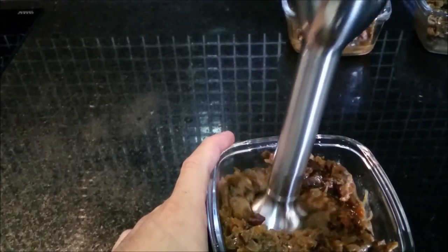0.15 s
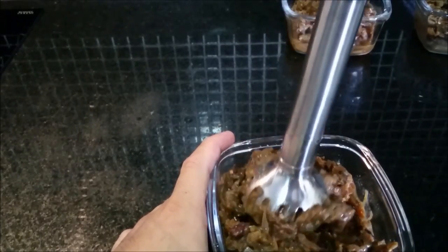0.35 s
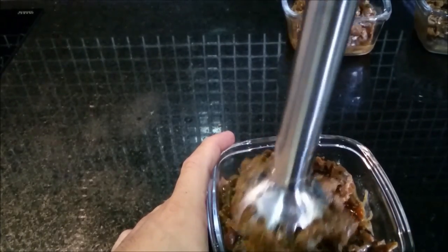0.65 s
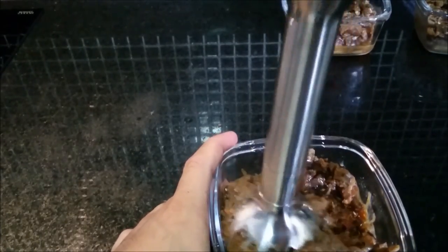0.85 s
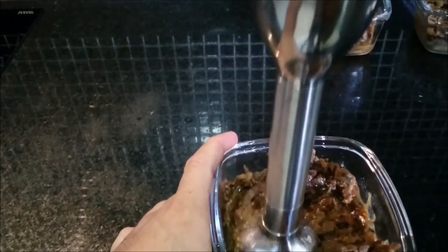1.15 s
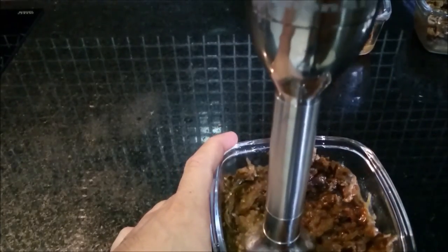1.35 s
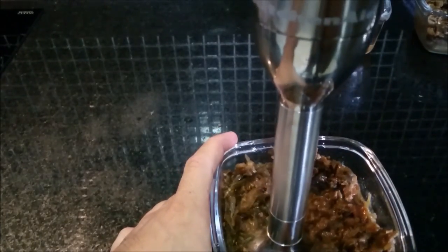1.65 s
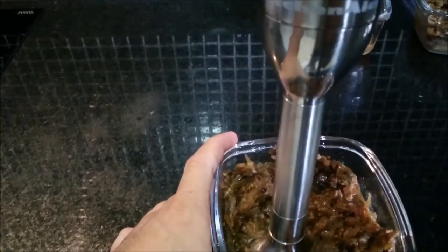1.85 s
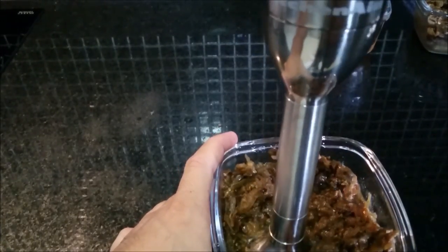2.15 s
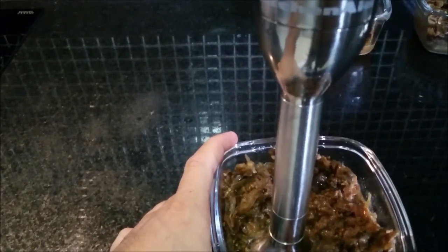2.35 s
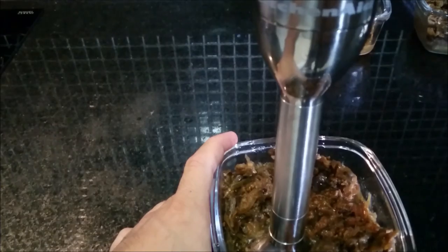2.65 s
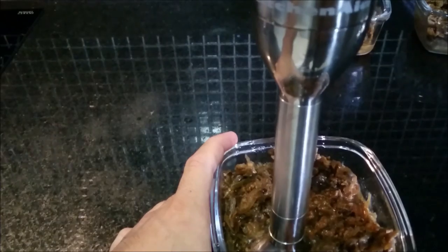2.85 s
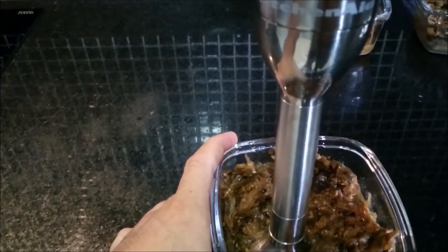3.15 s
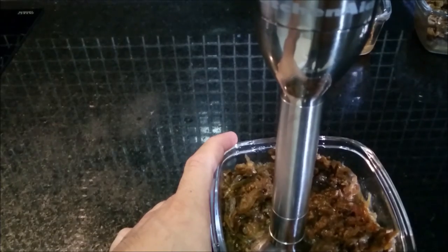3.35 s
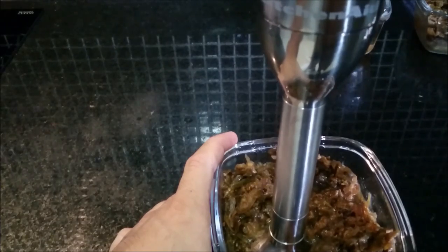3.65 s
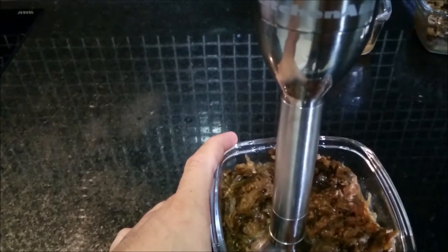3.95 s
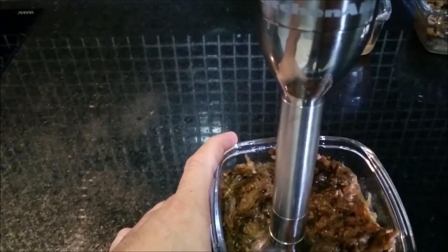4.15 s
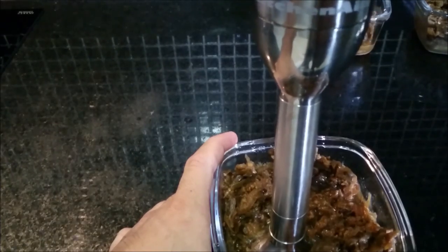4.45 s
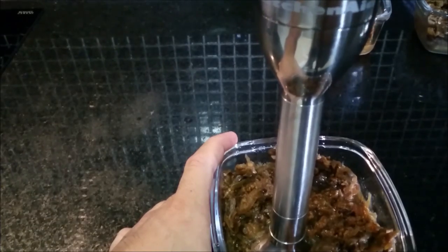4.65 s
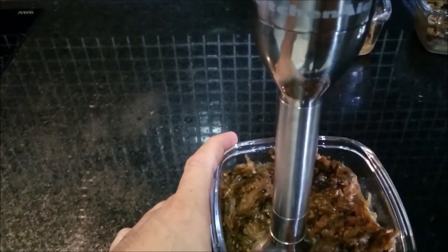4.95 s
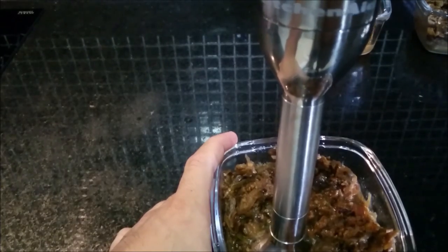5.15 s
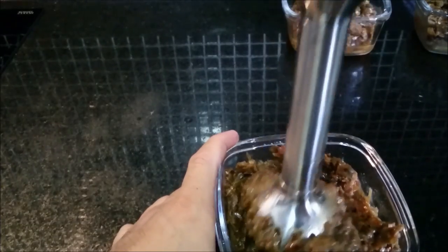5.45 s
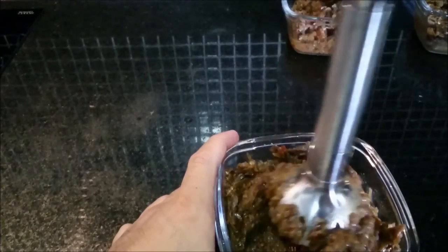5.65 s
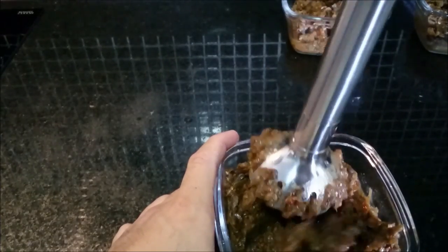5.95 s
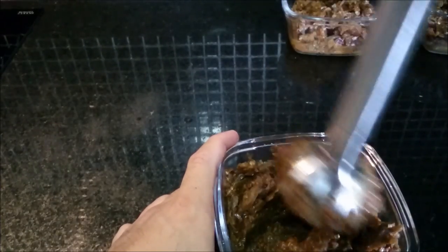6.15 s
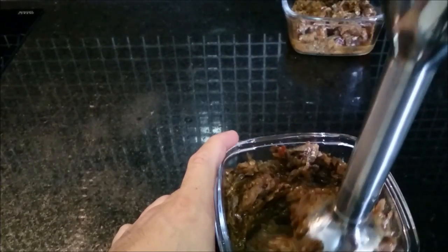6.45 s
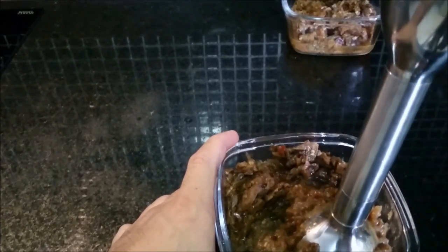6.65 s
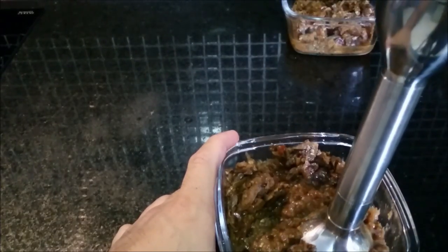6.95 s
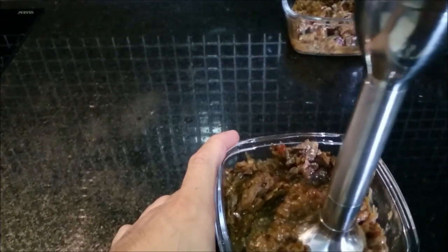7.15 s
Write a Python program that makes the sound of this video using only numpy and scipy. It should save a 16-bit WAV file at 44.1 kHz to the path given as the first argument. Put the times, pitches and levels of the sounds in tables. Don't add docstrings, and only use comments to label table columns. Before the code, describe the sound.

A close stereo microphone in a small, lively kitchen hears a hand blender already grinding thick food; it cuts off at 0.3 seconds with a click and a soft thud. At about 0.8 a quick cluster of loud steel-on-glass knocks rings out. Small creaks and clicks lead to a second burst from 1.2 to 1.9, with hard lumps snapping against the left side. Clicks, dull ticks and faint paste squeaks fill the gap before a short third burst at 3.1 to 3.5. More clicks and a falling squeak follow. A louder, faster-spinning burst runs from 4.7 to 5.1, then sharp knocks come at 5.3 to 5.4. A soft thud at 5.7, sliding squeaks around 6 and handling clicks near 6.5 precede the final burst, from 6.6 to the end. The motor's thin whine holds a fixed pitch over rattling, hissing churn; faint fridge hum lies beneath.

```python
import sys
import numpy as np
from scipy import signal
from scipy.fft import rfft, irfft, next_fast_len
from scipy.io import wavfile
from scipy.ndimage import map_coordinates

SR = 44100
rng = np.random.default_rng(int(sys.argv[2]) if len(sys.argv) > 2 else 0)


def file_out(sig):
    cols = np.atleast_2d(sig).T
    lim = np.clip(cols, -1, 1)
    pcm = np.round(lim * 32767).astype(np.int16)
    wavfile.write(sys.argv[1], SR, pcm)


def elevation(decibels):
    levels = np.asarray(decibels, float)
    return 10 ** (levels / 20)


N = 321930
TIME = np.arange(N) / SR
SWITCH_HZ = 1953.5
PORT_PHASE = np.array([[0], [np.pi / 2]])
BACKDROP_DB = np.array([[.8], [-.8]])

# (frequency [Hz], density [dB per Hz])
HOUSING_COLOUR = [(600, -24), (950, -9), (1150, 0.5), (1500, -3.5), (1800, -2), (2100, 3.5), (2500, -4.5),
                  (3200, -51.5)]
# (frequency [Hz], density [dB per Hz])
HISS_COLOUR = [(3500, -34), (4600, 1), (5900, -2.5), (6600, -0.5), (8000, -6), (10200, -9.5), (10900, -20),
               (14300, -20.5), (15000, -28.5), (16000, -63)]
# (frequency [Hz], density [dB per Hz])
BELL_COLOUR = [(2200, -20), (2700, 1.5), (3300, -1.5), (3900, 2.5), (4300, -4), (4800, -28), (6000, -49.5)]


def unit(x):
    return x / np.sqrt(np.mean(x ** 2) + 1e-20)


def along(points, hz):
    f, v = np.transpose(points)
    return np.interp(np.log(hz + 1), np.log(f + 1), v)


def wobble(rate, size=N):
    knots = rng.standard_normal(int(size * rate / SR) + 4)
    return map_coordinates(knots, [TIME[:size] * rate])


def filtered(x, response):
    m = next_fast_len(x.shape[-1] + 8192)
    spectrum = rfft(x, m) * response(np.fft.rfftfreq(m, 1 / SR))
    return irfft(spectrum, m)[..., :x.shape[-1]]


def coloured(x, spectrum):
    return unit(filtered(x, lambda hz: elevation(along(spectrum, hz))))


def spread(two, gain):
    # (frequency [Hz], likeness [0-1])
    likeness = [(30, 0.45), (60, 0.94), (300, 0.94), (640, 0.59), (1400, 0.23), (3000, 0.083)]

    def response(hz):
        turn = np.arccos(np.clip(along(likeness, hz), -1, 1)) / 2
        return gain(hz) * np.array([np.cos(turn), np.sin(turn)])

    mid, side = filtered(two, response)
    return np.array([mid + side, mid - side])


def pair(spectrum):
    return unit(spread(rng.standard_normal((2, N)), lambda hz: elevation(along(spectrum, hz))))


def placed(x, wet_db, pan_db=2.0, lag=32):
    # (frequency [Hz], t60 [s])
    decay = [(150, 0.16), (700, 0.47), (2000, 0.39), (5000, 0.29), (12000, 0.27)]
    x = x * np.ones((2, 1))
    hz, t, z = signal.stft(rng.standard_normal((2, SR * 2 // 5)), SR, nperseg=256)
    fading = z * elevation(-60 * t / along(decay, hz)[:, None])
    tail = signal.istft(fading, SR, nperseg=256)[1]
    build_up = 1 - np.exp(-np.arange(tail.shape[1]) / (0.00043 * SR))
    tail = spread(tail * build_up, np.ones_like)
    sound = elevation(wet_db) * signal.fftconvolve(x[1:], tail / np.linalg.norm(tail[0]), axes=1)
    sound[0, int(lag):][:x.shape[1]] += x[0]
    sound[1, :x.shape[1]] += x[1]
    return sound * elevation([[pan_db / 2], [-pan_db / 2]])


def add(out, x, s):
    part = out[:, max(round(s * SR), 0):][:, :x.shape[1]]
    part += x[:, :part.shape[1]]


def motor():
    # (motor on [s], motor off [s], blade bites after [s], sag at both ends [dB])
    bursts = [
        (0, .305, .05, 9),
        (1.213, 1.885, 0.045, 2),
        (3.064, 3.528, 0.036, 5.5),
        (4.724, 5.105, .045, 6),
        (6.608, 7.295, 0.055, -0.5),
    ]
    # (grind [dB], its trend as the bell lifts [dB/s], hiss re grind [dB], body re grind [dB],
    # bell re grind [dB])
    loads = [(-25.5, -57, -11, -14, 5), (-33, 0, -11, -15.5, 0), (-32.5, -3.5, -11.5, -17, -2),
             (-23, -5.5, -12, -16, -1), (-30, 0, -7.5, -8.5, -2)]
    # (full speed [Hz], drift [Hz/s], whine [dB], lower side tone re whine [dB],
    # upper side tone re whine [dB])
    spins = [(200, 200, -38, -6.5, -16), (203, 0.5, -37, -8.5, -12), (198, 0, -43, -4, 4.5),
             (382, 0, -42.5, -17, 6), (386.5, 0, -38.3, 0, -14)]
    # (overtones re whine [dB], dish buzz [dB], top hiss re hiss [dB])
    tints = [(3.5, -75, -10), (7.5, -61.5, -10.5), (10.5, -60, -29), (5, -41, -31.5), (4, -73, -36)]
    coast_s, coast_db_per_s, surge_db = .07, -350, 0.27
    out = np.zeros((2, N))
    for burst_times, load, spin, tint in zip(bursts, loads, spins, tints):
        on, off, bite_s, sag_db = burst_times
        level_db, trend, hiss_db, body_db, bell_db = load
        full_hz, drift, whine_db, low_db, high_db = spin
        over_db, buzz_db, top_db = tint
        t = np.arange(round((off - on + coast_s) * SR)) / SR
        size = len(t)
        running = t + (on < .1)

        grind_db = level_db + trend * t - sag_db * (2 * t / t[-1] - 1) ** 2
        grind_db += surge_db * wobble(5.27, size)
        grind_db += coast_db_per_s * np.clip(t - (off - on), 0, None)
        hiss_db = hiss_db - 1.0028 * trend * t
        bell_db = bell_db - 0.2 * trend * t + surge_db * wobble(11, size)
        bite = 1 - np.exp(-(running / bite_s) ** 2.9)

        spin_up = 1 - np.exp(-(running / .048) ** 2)
        speed = (full_hz + drift * t) * spin_up * (1 + .004 * wobble(12, size))
        shaft = 2 * np.pi * np.cumsum(speed) / SR
        tones = elevation(whine_db) * np.sqrt(2) * whine(t, shaft, speed / full_hz, low_db, high_db, over_db)
        tones += elevation(buzz_db) * dish_buzz(shaft, speed / full_hz)
        grind = elevation(grind_db - 4.5) * rattle(shaft, bell_db, hiss_db, body_db, top_db)

        ends = np.clip(np.minimum(running, t[-1] - t) / 0.0021, 0, 1)
        powered = np.clip((off - on - t) / 0.0021, 0, 1)
        add(out, placed(ends * powered * tones, wet_db=-15, lag=0), on)
        add(out, placed(ends * bite * grind, wet_db=-3.0), on)
        add(out, placed(elevation(whine_db - 19) * idling_supply(), wet_db=-10.5, lag=0), off)
    return out


def whine(t, shaft, pace, low_db, high_db, over_db):
    # (multiple [1], level [dB])
    overtones = [(2, -23), (3, -36), (4, -24.5), (5, -38)]
    size = len(t)
    carrier = 2 * np.pi * SWITCH_HZ * t + PORT_PHASE
    load = np.sqrt(pace)
    tone = np.sin(carrier) * elevation(2.6 * wobble(28, size) + 8 * (load - 1))
    harmonics = sum(elevation(db) * np.sin(k * carrier[0] + PORT_PHASE) for k, db in overtones)
    tone += elevation(over_db + 2 * wobble(37, size)) * harmonics
    for db, turn in ((low_db, -shaft), (high_db, shaft)):
        tone += load ** 1.5 * elevation(db + 2 * wobble(22, size)) * np.sin(carrier + turn)
    return tone


def dish_buzz(shaft, pace):
    low = np.sin(.402 * shaft + .5 * PORT_PHASE)
    return (low + .4 * np.sin(1.6 * shaft + PORT_PHASE)) * pace ** 4


def rattle(shaft, bell_db, hiss_db, body_db, top_db):
    # (frequency [Hz], density [dB per Hz])
    body = [(25, -4), (60, -9), (140, -23.5), (300, -12), (500, -8.5), (750, -0.5), (1000, -2),
            (1400, -29.5)]
    # (frequency [Hz], density [dB per Hz])
    rumble = [(20, -12.5), (60, -2.5), (140, -7.5), (220, -11.5), (400, -45)]
    # (frequency [Hz], density [dB per Hz])
    spray = [(9500, -41.5), (11000, 0.5), (13500, 2), (15800, -12.5), (16500, -40)]
    size = len(shaft)
    grains_db = 3.2 * np.minimum(rng.exponential(size=size), 6)
    slaps = rng.standard_normal((6, 2, size)) * elevation(grains_db)
    slaps *= elevation(2 * np.sin(shaft / 2) + 1.4 * wobble(45, size))
    slaps[:, 0] = 1.44 * slaps[:, 0] + 0.17 * slaps[:, 1]
    noise = coloured(slaps[0], HOUSING_COLOUR)
    noise += elevation(bell_db) * coloured(slaps[3], BELL_COLOUR)
    noise += elevation(hiss_db) * coloured(slaps[1], HISS_COLOUR)
    noise += elevation(body_db) * coloured(slaps[2, 1], body)
    noise += elevation(-19) * coloured(slaps[4, 1], rumble)
    noise += elevation(hiss_db + top_db) * coloured(slaps[5], spray)
    return noise


def idling_supply():
    return np.sin(2 * np.pi * SWITCH_HZ * TIME[:round(.125 * SR)] + PORT_PHASE)


def burst(colour, t60):
    t = TIME[:SR // 4]
    return coloured(rng.standard_normal((2, len(t))), colour) * elevation(-60 * t / t60)


def rings(modes):
    t, out = TIME[:SR // 4], 0
    for hz, db, t60 in modes:
        decay_db = db + 3 * rng.standard_normal((2, 1)) - 60 * t / t60
        out = out + elevation(decay_db) * np.sin(2 * np.pi * hz * (1 + rng.normal(0, .01)) * t)
    return out


def knocks():
    # (time [s], peak [dB], hollow ring [dB], crack re peak [dB])
    blows = [(0.779, 1, -34, -21.5), (0.79, -9.5, -40, -30), (0.8168, 8, -16.5, -19),
             (0.837, -31, -33, -36), (.862, -12, -33, -15), (0.8965, -2.5, -30, -19),
             (5.306, -22, -27.5, -23.5), (5.3178, -26, -22.5, -16), (5.373, -22.5, -5, -25.5),
             (5.375, 1, -9.5, -31), (5.3832, 3.5, -12, -17), (5.389, 0, -20.5, -30.5),
             (5.395, -9, -20, -28.5)]
    # (frequency [Hz], level [dB], t60 [s])
    glass = [(1336, -3, .04), (1500, -5, .03), (2080, -4, .06), (2220, -3, .04), (2556, -4, .03),
             (2720, 3.5, .05), (3280, -1, .03), (3420, 0, .025), (3860, -2, .03), (4150, -5, .025),
             (5160, -16, .02), (7400, -20, .015)]
    # (frequency [Hz], level [dB], t60 [s])
    hollow = [(725, -5, .07), (765, -1, .1), (805, -1, .1), (848, 1, .12), (880, -4, .06), (500, -14, .04),
              (2040, -1, .14), (2105, 0, .12)]
    # (frequency [Hz], density [dB per Hz])
    thump = [(20, 2), (70, -1), (150, -4), (300, -9.5), (500, -43.5)]
    out = np.zeros((2, N))
    edge = 1 - np.exp(-TIME[:SR // 4] / .0003)
    for s, db, hollow_db, crack_db in blows:
        blow = 0.38 * burst(HOUSING_COLOUR, t60=0.056) + 1.24 * burst(BELL_COLOUR, t60=0.012)
        blow += 0.15 * rings(glass) + 0.5 * elevation(hollow_db - 2) * rings(hollow)
        blow += elevation(crack_db) * burst(HISS_COLOUR, t60=0.038)
        blow += elevation(-34) * burst(thump, t60=0.36)[0]
        add(out, placed(elevation(db - 3) * blow * edge, wet_db=-3.0), s)
    return out


def set_downs():
    # (time [s], level [dB], t60 [s])
    thuds = [
        (.44, -46.5, 0.37),
        (5.744, -39.5, 0.31),
        (6.41, -50, 0.102),
    ]
    # (frequency [Hz], density [dB per Hz])
    soft = [(150, -28), (300, -5.5), (600, -2), (760, 3.5), (950, -7), (1500, -7), (2500, -17), (5000, -49)]
    out = np.zeros((2, N))
    edge = 1 - np.exp(-TIME[:SR // 4] / 0.0049)
    for s, db, t60 in thuds:
        add(out, placed(elevation(db) * burst(soft, t60) * edge, wet_db=-4.5), s)
    return out


def contact(out, s, db, hz, snap_db, pan_db, shift=1):
    # (frequency [Hz], density [dB per Hz])
    snap_colour = [(1500, -19.5), (2300, -7), (5200, -7), (6300, 5), (7600, -3), (11000, -15.5),
                   (15500, -19.5)]
    t = np.arange(SR // 60) / SR
    noise = rng.standard_normal((2, 2, len(t)))
    ring = [(.5 * hz, -30), (.8 * hz, -6), (hz, 0), (1.2 * hz, -7), (1.6 * hz, -40)]
    tick = coloured(noise[0], ring) * elevation(-60 * t / .014)
    snap = coloured(noise[1], [(shift * f, level) for f, level in snap_colour]) * elevation(-60 * t / .006)
    blow = 0.45 * tick * (1 - np.exp(-t / 0.0002)) + elevation(snap_db) * snap
    blow *= 1 - np.exp(-t / 0.000081)
    wet_db = -6 + .25 * np.clip(snap_db, -30, 0)
    add(out, placed(elevation(db) * blow, wet_db=wet_db, pan_db=pan_db), s - .0004)


def buttons():
    # (time [s], peak [dB], ring [Hz], snap re peak [dB])
    presses = [(.303, -22.5, 2930, 1.5), (5.1021, -20.5, 2090, 4), (1.1364, -24.5, 2680, 5.5),
               (1.2009, -20.5, 4150, -5), (1.888, -19.5, 2200, 2), (2.2819, -26, 2490, 0),
               (2.5594, -26, 2400, 2), (2.9682, -29, 2220, 11), (3.5272, -22, 2280, 6.5),
               (3.69, -44, 4250, 1.5), (3.8383, -28.5, 3500, 0), (4.1338, -29, 3500, 2),
               (4.3255, -27.5, 3620, 0.5), (4.6346, -25.5, 3880, 10), (5.242, -27, 3920, -4.5),
               (6.5183, -17.5, 3740, -2)]
    # (time [s], peak [dB], ring [Hz])
    releases = [(1.2546, -34, 2060), (2.0582, -37.5, 3680), (2.1267, -35, 2460), (2.4617, -21, 2960),
                (2.695, -22, 3000), (2.7398, -35, 2340), (3.066, -33, 3250), (3.093, -39, 3150),
                (6.519, -23.5, 2690), (4.0023, -21.5, 2770), (4.2645, -20.5, 2770), (4.442, -21.5, 2840),
                (4.7584, -24, 2090), (6.554, -21.5, 3600)]
    # (time [s], peak [dB], ring [Hz])
    creaks = [(1.1044, -31.5, 3970), (1.117, -32, 3560), (1.1263, -33, 3700), (1.191, -38.5, 2900),
              (1.2277, -26.5, 3890), (6.4148, -38.5, 3470), (6.4199, -43.5, 2720), (6.4302, -37.5, 4040),
              (6.56, -25, 3370), (6.5933, -37, 2620), (6.615, -27.5, 1410)]
    out = np.zeros((2, N))
    for s, db, hz, snap_db in presses:
        contact(out, s, db, hz, snap_db, pan_db=2)
    for s, db, hz in releases:
        contact(out, s, db, hz, snap_db=-38, pan_db=1.5)
    for s, db, hz in creaks:
        contact(out, s, db, hz, snap_db=-17, pan_db=10.5)
    return out


def lumps():
    # (time [s], peak [dB], ring [Hz], snap re peak [dB])
    hits = [(1.295, -31, 4060, -7), (1.321, -31, 4100, -5), (1.4073, -21, 3100, -2.5),
            (1.4102, -22.5, 3050, -5), (1.459, -17, 3080, -11.5), (1.598, -28.5, 4000, -30.5),
            (1.6328, -12.5, 3430, -24.5), (1.6454, -10, 3540, -19), (1.6584, -16, 3330, -27),
            (1.7109, -23, 3780, -7), (5.2877, -26.5, 3200, -29), (5.309, -27.5, 2300, -18),
            (5.317, -23.5, 1350, -26), (6.957, -34, 3900, -2.5)]
    out = np.zeros((2, N))
    for s, db, hz, snap_db in hits:
        contact(out, s, db, hz, snap_db, pan_db=16, shift=1.26)
    return out


def squeaks():
    # (start [s], end [s], peak [dB], first pitch [Hz], last pitch [Hz])
    paste = [
        (2.238, 2.32, -61, 3540, 3460),
        (2.707, 2.8, -58, 4060, 3960),
        (2.85, 2.991, -53.5, 4200, 3330),
        (3.879, 4.05, -55, 3740, 3130),
        (5.856, 5.96, -60.5, 3970, 4000),
        (5.96, 6.264, -56.5, 4100, 3580),
        (6.373, 6.522, -58, 3790, 4050),
    ]
    out = np.zeros((2, N))
    for s, end, db, first_hz, last_hz in paste:
        count = round((end - s) * SR)
        flutter = np.array([wobble(1100, size=count), wobble(800, size=count)])
        swell = np.sin(np.linspace(0, np.pi, count)) ** 1.2
        swell *= elevation(db + 1 + 0.53 * wobble(17.5, size=count))
        glide = np.sin(2 * np.pi * np.cumsum(np.linspace(first_hz, last_hz, count)) / SR)
        add(out, swell * flutter * glide, s)
    return out * elevation(BACKDROP_DB)


def kitchen():
    # (frequency [Hz], density [dB per Hz])
    air_colour = [(20, -36.5), (46, -21), (90, -12.5), (160, -19.5), (250, -14.5), (450, -24), (700, -24.5),
                  (1200, -31), (3200, -38.5), (4000, -31), (4600, -40), (9300, -46), (10300, -73),
                  (15800, -90)]
    air = elevation(-50.5 + 1.6 * wobble(3.4)) * pair(air_colour)
    hum = elevation(-57 + 1.2 * wobble(2.2)) * pair([(45, -40), (55, 4), (62, 8), (69, -2), (82, -40)])
    return (air + hum) * elevation(BACKDROP_DB)


def scene():
    handling = knocks() + set_downs() + buttons() + lumps()
    return motor() + handling + squeaks() + kitchen()


def top_cut(x):
    return signal.sosfilt(signal.butter(12, 15880, fs=SR, output="sos"), x)


def record(dry):
    x = dry * [[1], [-1]]
    x = x / (1 + np.abs(x / .97) ** 4) ** (1 / 4)
    x = filtered(x, lambda hz: hz < 15900)
    return top_cut(x)


dry = scene()
out = record(dry)
file_out(out)
```